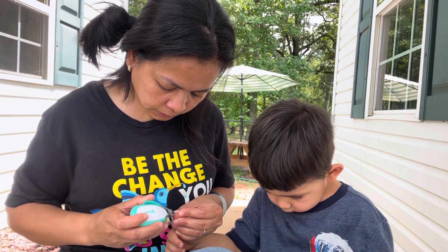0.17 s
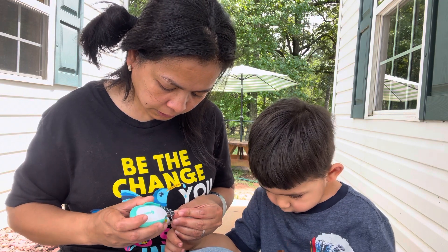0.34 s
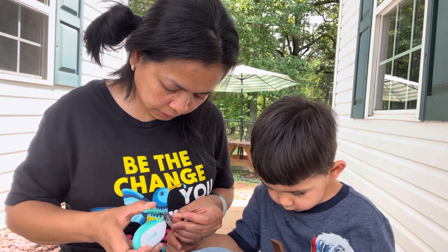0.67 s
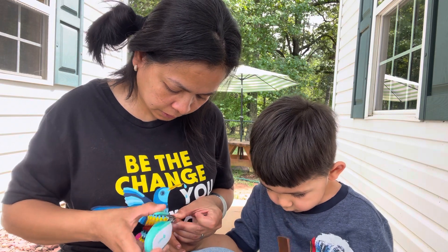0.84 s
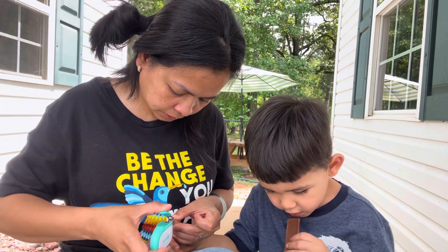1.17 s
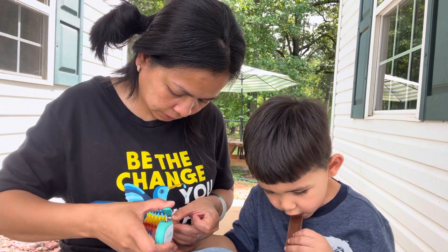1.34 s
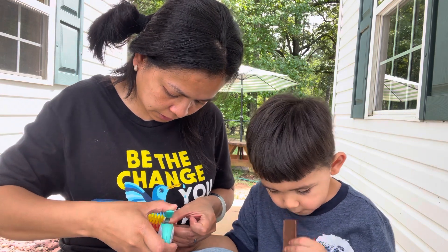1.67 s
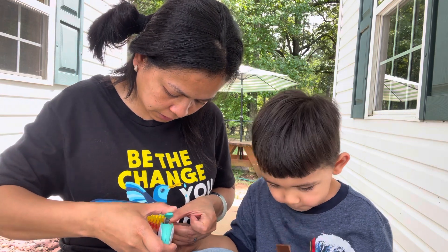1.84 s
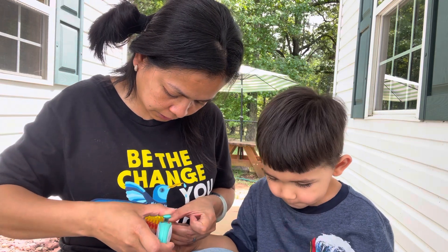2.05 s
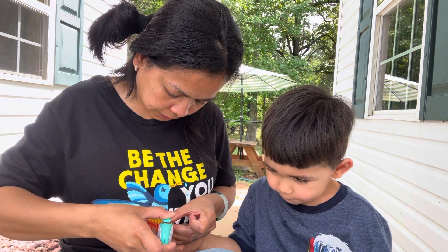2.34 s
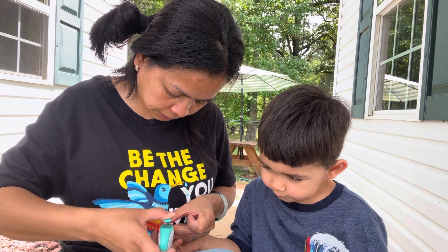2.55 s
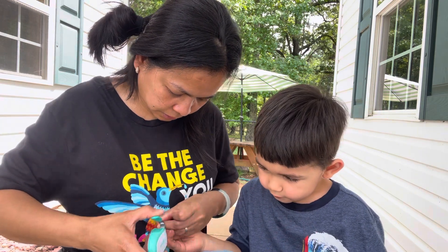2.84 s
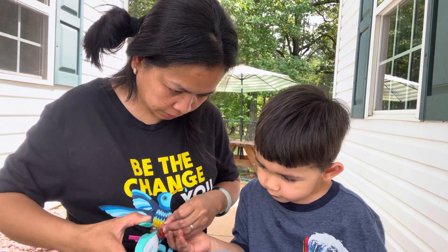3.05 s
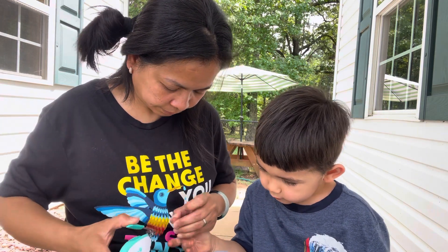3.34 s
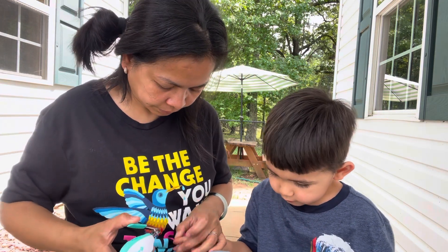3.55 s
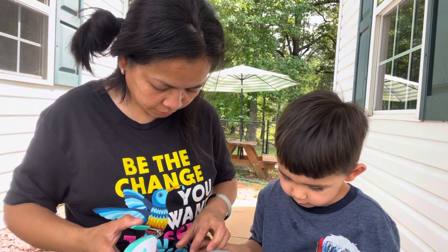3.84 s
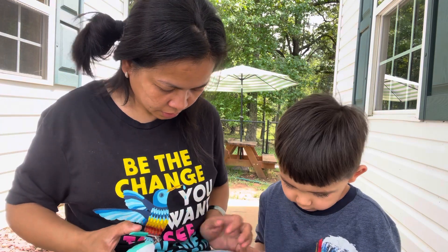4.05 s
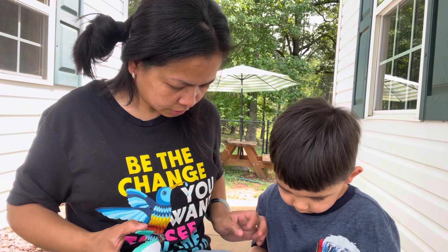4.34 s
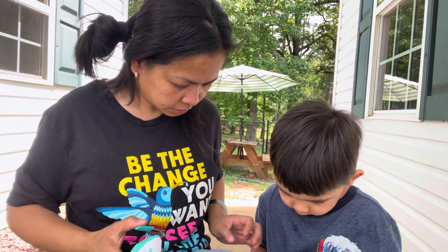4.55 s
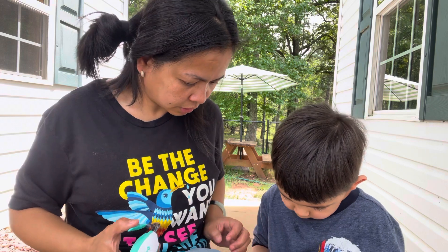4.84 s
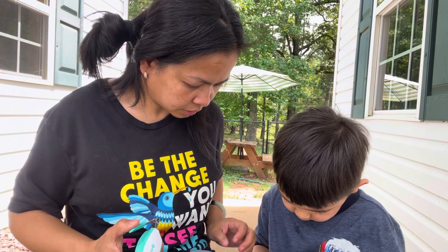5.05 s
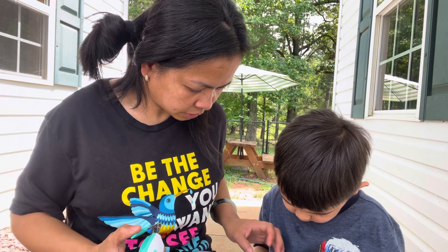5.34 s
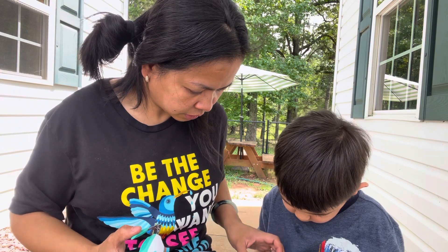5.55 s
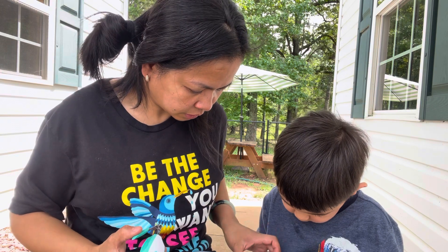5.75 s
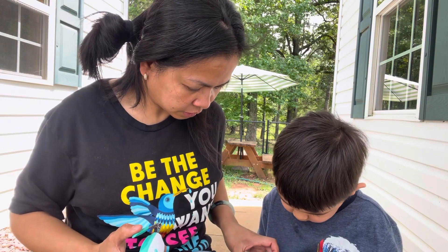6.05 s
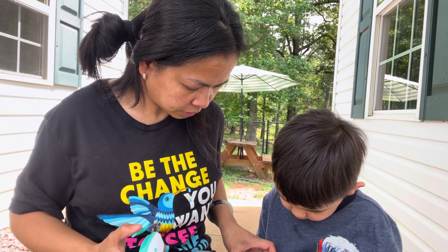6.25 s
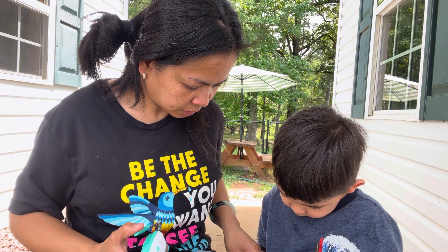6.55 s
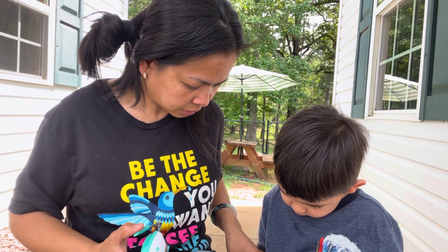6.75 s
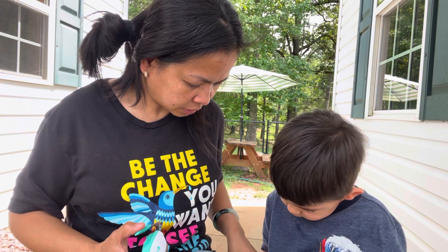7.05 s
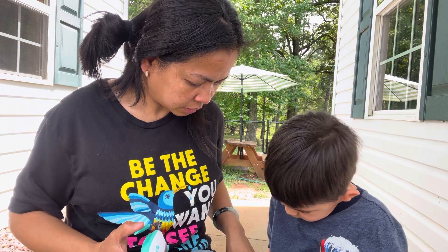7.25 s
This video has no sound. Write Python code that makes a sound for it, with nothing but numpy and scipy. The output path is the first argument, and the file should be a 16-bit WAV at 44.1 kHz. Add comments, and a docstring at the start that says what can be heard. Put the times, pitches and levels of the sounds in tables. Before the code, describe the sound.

Two crisp metallic clicks of a nail clipper on a porch, with a droning cooling unit and pulsing insects behind.

```python
"""A nail clipper snaps twice on a summer porch: each time the nail gives way in two quick slips
that ring the steel and leave a thin shimmer. A cooling unit drones beside the house, its shaft hum
surging under a wavering low tone and a beating octave while the sheet metal buzzes. Insects throb
in the trees over a soft outdoor hiss. There are a few dry ticks and one faint squeak, and cloth
rustles close by at the end."""
import sys
import numpy as np
from scipy import signal
from scipy.fft import rfft, irfft
from scipy.io import wavfile

SR = 44100
rng = np.random.default_rng(int(sys.argv[2]) if len(sys.argv) > 2 else 0)


def generate_wav(sig):
    """Save sig (samples, or channels by samples) to the path in sys.argv[1] as 16-bit PCM at SR."""
    pcm = np.round(np.clip(np.atleast_2d(sig).T, -1, 1) * 32767).astype(np.int16)
    wavfile.write(sys.argv[1], SR, pcm)


N = 326726


def amp(db):
    return 10 ** (np.asarray(db) / 20)


def unit_rms(x):
    return x / np.sqrt(np.mean(x ** 2) + 1e-20)


def automation(rows):
    """One curve through the scene for each column after time_s."""
    time_s, *columns = np.transpose(rows)
    return [np.interp(np.arange(N) / SR, time_s, column) for column in columns]


def at_hz(points, hz):
    """Read a curve along a log frequency axis."""
    point_hz, values = np.transpose(points)
    return np.interp(np.log(hz), np.log(point_hz), values)


def pan(db):
    """Stereo gains with the left db louder than the right."""
    return amp(np.array([[db], [-db]]) / 2)


def drift(rate_hz):
    """Slow random wander with a spread of 1."""
    step, settle = 40, 2000
    r = np.exp(-2 * np.pi * step * rate_hz / SR)
    slow = signal.lfilter([1], [1, -2 * r, r * r], rng.standard_normal(N // step + settle + 2))[settle:]
    return np.interp(np.arange(N) / step, np.arange(len(slow)), unit_rms(slow))


def resonate(x, hz, width_hz):
    """A single band-pass resonance."""
    r = np.exp(-np.pi * width_hz / SR)
    gain = (1 - r * r) / 2
    return signal.lfilter([gain, 0, -gain], [1, -2 * r * np.cos(2 * np.pi * hz / SR), r * r], x)


def band(noise, hz, width_hz):
    """Noise rung twice through one resonance, at unit RMS."""
    return unit_rms(resonate(resonate(noise, hz, width_hz), hz, width_hz))


def tone(phase, pan_db, lead_rad):
    """A panned sine whose left side leads in phase."""
    return np.sqrt(2) * pan(pan_db) * np.cos(phase + [[lead_rad], [0]])


def port_phase(hz):
    """Phase at the two microphone ports: in the treble the left gains on the right as pitch rises."""
    from_hz, in_step_hz, hz_per_turn = 5600, 11600, 5400
    return np.pi * (hz - in_step_hz) / hz_per_turn * (hz > from_hz) * np.array([[1], [-1]])


def at_ports(x):
    """A mono sound as it reaches the two ports."""
    hz = np.fft.rfftfreq(len(x), 1 / SR)
    return irfft(rfft(x) * np.exp(1j * port_phase(hz)), len(x))


def outdoor_hiss():
    """A far, lightly fluttering bed of air; its top end reaches both ports almost as one."""
    # tone of the hiss: frequency_hz, relative_db
    spectrum = [(45, -26), (80, -20.5), (125, -41), (260, -33.5), (480, -31.5), (750, -30), (1100, -32.5),
                (1740, -33.5), (2600, -36.5), (3500, -42.5), (5200, -43.5), (8250, -39), (8700, -44.5),
                (9200, -51), (10000, -54), (11000, -58), (12300, -62), (13500, -68), (14400, -72),
                (14800, -80)]
    # its slow swell: time_s, level_db
    swell = [(0.0, -49), (3.1, -48.5), (4.1, -47.5), (5.8, -48), (6.55, -46.5), (7.0, -47.5), (7.41, -46)]
    # how alike left and right are: frequency_hz, correlation (clipped to +-1)
    likeness = [(60, 0.024), (120, 0.65), (300, -1.17), (700, -0.55), (2000, -0.25), (5000, 0.38),
                (10000, 0.99)]
    # its lean to the left: frequency_hz, pan_db
    lean = [(60, 8), (150, -6), (380, -3.5), (950, -0.5), (2380, 2.5), (5980, 2.5), (9000, 1), (15000, -2)]
    treble_hz, treble_likeness = 7800, .97
    hz = np.maximum(np.fft.rfftfreq(N, 1 / SR), 1)
    mid, side = rfft(rng.standard_normal((2, N)))
    alike = np.clip(at_hz(likeness, hz), -1, 1)
    wide = np.sqrt(1 + alike) * mid + np.sqrt(1 - alike) * side * [[1], [-1]]
    treble = np.sqrt(treble_likeness) * mid * np.exp(1j * port_phase(hz))
    treble += np.sqrt(1 - treble_likeness) * side * [[1], [1j]]
    noise = np.where(hz > treble_hz, np.sqrt(2) * treble, wide)
    colour = amp(at_hz(spectrum, hz)) * pan(at_hz(lean, hz))[:, 0] * (hz < 1.03 * spectrum[-1][0])
    return amp(automation(swell)[0] + .4 * drift(5)) * unit_rms(irfft(noise * colour, N))


def insect_throb(rate_hz=7.22, peak_s=.02):
    """The pulse that all the insects share."""
    return np.cos(2 * np.pi * rate_hz * (np.arange(N) / SR - peak_s))


def low_insects():
    """A lower-pitched kind of insect throbs with the rest and thins out near the end."""
    # bands of their song: pitch_hz, width_hz, level_db
    song = [(4157, 510, -63), (4476, 330, -63)]
    fade_from_s, fade_db_per_s = 6.6, 4.5
    rasp = rng.standard_normal((2, N))
    fade_db = fade_db_per_s * np.maximum(np.arange(N) / SR - fade_from_s, 0)
    return sum(amp(db + 1.5 * drift(8.9) + 2 * insect_throb() - fade_db) * band(rasp, hz, width)
               for hz, width, db in song)


def tree_insects():
    """A far chorus of wing resonances and one nearer singer, throbbing in trees to the left."""
    # swell of the song: time_s, chorus_db, singer_db
    swell = [(0.0, -50.5, -57.5), (1.0, -51.5, -55.5), (2.0, -51, -54.5), (3.2, -48.5, -61),
             (4.5, -50, -58), (5.3, -47, -80), (6.7, -51, -78), (7.41, -50, -76)]
    # broad wing resonances: pitch_hz, relative_db
    wings = [(6100, -2.5), (6350, -2), (6640, 1.5), (6900, 0), (7200, 3), (7500, -4), (7800, -3),
             (8100, -4)]
    # single thin voices in the chorus: pitch_hz, width_hz, relative_db
    thin_voices = [(6050, 30, -13), (6245, 25, -8), (6340, 25, -12), (6420, 25, -10), (6500, 25, -9),
                   (6700, 30, -9), (6845, 25, -8), (6930, 25, -11), (6985, 25, -9), (7120, 25, -10),
                   (7170, 25, -12), (7296, 25, -9), (7440, 30, -11), (7670, 30, -12), (7800, 30, -11),
                   (7940, 30, -11), (8050, 35, -12), (8250, 40, -15)]
    chorus_db, singer_db = automation(swell)
    throb = insect_throb()
    left, right = at_ports(rng.standard_normal(N))
    rasp = np.array([left, np.roll(right, 1)]) + .8 * rng.standard_normal((2, N))
    rasp = signal.sosfilt(signal.butter(4, 9000, fs=SR, output="sos"), rasp)
    chorus = sum((-1) ** k * amp(db + 1.5 * drift(2.5) + 1.5 * throb) * band(rasp, hz, width_hz=380)
                 for k, (hz, db) in enumerate(wings))
    other_rasp = np.roll(rasp, N // 2, axis=1)
    chorus += sum(amp(db + 6 + 3.3 * drift(1.4) + 1.4 * throb) * band(other_rasp, hz, width)
                  for hz, width, db in thin_voices)
    singer = amp(4 * throb + drift(6)) * band(rasp, hz=6635, width_hz=90)
    return pan(2.5) * (amp(chorus_db) * unit_rms(chorus) + amp(singer_db) * unit_rms(singer))


def cooling_unit():
    """Shaft harmonics surge together in level and pitch, drone tones waver and sheet metal buzzes."""
    # shaft hum: harmonic, level_db, pan_db, left_lead_rad
    shaft = [(2, -51, 0, 0), (3, -50.5, 0, 0), (4, -55, -2, -.2), (5, -38, -3.7, -.05), (6, -46, -5, .34),
             (7, -53, -1, -.15), (8, -52, -1.5, -1.2), (10, -60, 5, 1.2), (11, -65, 3, 1.7)]
    # the low tone sinks and returns: trough_s, fall_s, return_s, depth_db
    dips = [(1.1, 0.72, 0.31, 11), (3.6, 0.41, 0.16, 28), (6.75, 0.61, 0.17, 14)]
    # swells of the octave, ahead of its beating: time_s, level_db
    octave_swells = [(0.2, -50), (1.05, -36.5), (1.6, -41), (2.9, -40.5), (4.2, -40.5), (5.0, -54),
                     (5.75, -38.5), (6.5, -54), (7.3, -48.5)]
    # steady rattle of the panels: pitch_hz, width_hz, level_db, pan_db
    panels = [(90.6, 115, -52.5, 0), (564.4, 14.4, -64, -9.5), (609.5, 6.6, -69.5, 7), (666, 15, -70.5, 0),
              (1429, 33, -76, 14), (1741, 24, -72.5, 15)]
    # buzz of the casing: pitch_hz, width_hz, relative_db, pan_db
    casing = [(152.8, 17.7, 0.5, -5.5), (250.7, 6.3, -12, 15.5), (310.7, 21.8, -1, 4), (360, 75, -6.5, 4)]
    shaft_hz, drone_hz, octave_hz = 22.912, 103.07, 206.75
    surge_period_s, surge_peak_s = 1.38, 1.08
    beat_depth, beat_trough_s, overtone_lag_s = .39, .77, .13
    t = np.arange(N) / SR
    surge = 1 + .11 * np.exp(-2j * np.pi * (t - surge_peak_s) / surge_period_s)
    out = np.zeros((2, N))
    for harmonic, db, pan_db, lead_rad in shaft:
        level = amp(db + 1.74 * drift(8.2)) * np.abs(surge)
        phase = 2 * np.pi * harmonic * shaft_hz * t + np.angle(surge) + .66 * drift(6.4)
        out += level * tone(phase, pan_db, lead_rad)
    dip_db = sum(db * np.exp(-((t - s) / np.where(t < s, fall, back)) ** 2) for s, fall, back, db in dips)
    drone_db = -33 + drift(2.9) - dip_db
    buzz_db = -55.5 + t + .06 * drift(2.1)  # creeps up 1 dB a second
    drone_phase = 2 * np.pi * drone_hz * (t - .0024) + .12 * drift(25)
    out += amp(drone_db) * tone(drone_phase, pan_db=-3, lead_rad=-.3)
    # the octave beats once in each surge
    beat_phase = 2 * np.pi * (t - beat_trough_s) / surge_period_s
    beat = np.abs(1 - beat_depth * np.exp(1j * beat_phase)) / (1 + beat_depth)
    octave_db = automation(octave_swells)[0] + 2.5 * drift(7)
    octave_phase = 2 * np.pi * octave_hz * t + .45 * drift(1.5)
    out += beat * amp(octave_db) * tone(octave_phase, pan_db=.5, lead_rad=-1.18)
    shake = rng.standard_normal(N) + .42 * rng.standard_normal((2, N))
    # an upper overtone swells just after each beat
    late_beat = np.roll(beat, round(overtone_lag_s * SR))
    out += amp(-55.5) * late_beat * pan(3.3) * band(shake, hz=412, width_hz=8.6)
    rattle = sum(amp(db) * pan(pan_db) * band(shake, hz, width) for hz, width, db, pan_db in panels)
    buzz = sum(amp(db) * pan(pan_db) * band(shake, hz, width) for hz, width, db, pan_db in casing)
    return out + rattle + amp(buzz_db) * buzz


def squeak():
    """A faint rough scrape: a band of noise that scoops up in pitch and fades."""
    start_s, length_s, edge_s = 3.88, .41, .003
    from_hz, to_hz, glide_s = 1500, 2300, .012
    level_db, fade_db_per_s = -56, 23
    age = np.maximum(np.arange(N) / SR - start_s, 0)
    hz = to_hz - (to_hz - from_hz) * np.exp(-age / glide_s)
    gate = np.clip(np.minimum(age, length_s - age) / edge_s, 0, 1)
    grit = signal.sosfilt(signal.butter(4, 280, fs=SR, output="sos"), rng.standard_normal((2, N)))
    phase = 2 * np.pi * np.cumsum(hz) / SR
    scrape = unit_rms(grit[0] * np.cos(phase) + grit[1] * np.sin(phase))
    return gate * amp(level_db - fade_db_per_s * age) * scrape


def cloth_rustle():
    """Cloth drags close by: a dull body with a bump near 1 kHz, and fine fibre noise on top."""
    # shape of the drag: time_s, body_db, fibre_db
    drag = [(7.28, -63, -88), (7.352, -35, -49.5), (7.372, -41.5, -73), (7.386, -36.5, -47),
            (7.397, -37, -56), (7.409, -52, -50)]
    body_db, fibre_db = automation([(drag[0][0] - .05, -110, -110)] + list(drag))
    friction = rng.standard_normal(N)
    rub = friction + .5 * rng.standard_normal((2, N))
    body = (.78 * band(rub, hz=945, width_hz=200) + .75 * band(rub, hz=475, width_hz=140)
            + 1.27 * band(rub, hz=273, width_hz=170) + .34 * band(rub, hz=1450, width_hz=270)
            + .22 * band(rub, hz=3500, width_hz=1600))
    fibre = signal.sosfilt(signal.butter(4, [8000, 15500], "band", fs=SR, output="sos"), at_ports(friction))
    fibre = resonate(fibre, hz=9700, width_hz=1100)
    return amp(body_db) * unit_rms(body) + amp(fibre_db) * unit_rms(fibre)


def dry_ticks():
    """Small ticks from fingers and seat, each a sine damped almost at once."""
    # light contacts: start_s, level_db, pitch_hz, decay_per_s
    contacts = [(1.179, -30.5, 3800, 1800), (1.1795, -33.5, 4900, 1800), (3.887, -44, 1900, 900),
                (7.387, -30, 6000, 1480), (7.387, -20, 9600, 3000), (7.389, -41, 13600, 2000)]
    out, t = np.zeros((2, N)), np.arange(round(.01 * SR)) / SR
    attack = np.sin(np.pi / 2 * np.minimum(t / .00012, 1)) ** 2
    for start_s, db, hz, decay_per_s in contacts:
        ping = np.sin(2 * np.pi * hz * t + port_phase(hz)) * np.exp(-t * decay_per_s)
        i = round(start_s * SR)
        out[:, i:i + len(t)] += amp(db) * attack * ping
    return out


def nail_clipper():
    """The nail gives way in two slips that ring the steel; a thin shimmer dies away after them."""
    # snaps of the jaws: start_s, level_db, tilt_db_per_octave, lever_pan_db, second_slip_s,
    # second_slip_db, grip_pitch_ratio, lever_db, jaw_tip_db, shimmer_db
    snaps = [(0.2920, -21.5, 2.5, -3, 0.0006, -9, 0.927, -4, 4, 3),
             (2.3280, -19.5, 0.5, -7, 0.0005, -13, 1.007, 0, -3, 1.5)]
    # steel modes, the lever low and the jaw tips high: pitch_hz, relative_db, t60_s
    steel = [(420, -10, .007), (680, -4.5, .0045), (1030, -2, .005), (1450, -3, .0065), (1800, -6, .005),
             (2200, -4, .005), (2800, -4.5, .005), (3430, -5.5, .011), (3700, -11, .007), (4300, -7, .005),
             (4600, -7.5, .007), (5250, -7, .009), (6200, -7, .008), (7600, -7, .006), (8300, -6.5, .006),
             (9500, -7, .006), (10450, -3.5, .006), (11750, -3.5, .006), (12700, -9, .006),
             (14200, -14, .007), (15600, -8, .007)]
    # noisy tail of a snap: pitch_hz, width_hz, relative_db, t60_s
    shimmer = [(5000, 700, -29, .16), (10500, 800, -32, .17), (11200, 900, -30, .19),
               (12000, 800, -31.5, .19), (15500, 380, -28, .12)]
    lever_top_hz, jaw_tip_from_hz, shimmer_top_hz = 6500, 12200, 16200
    lever_lag_s, attack_s, crackle_t60_s = .00035, .0004, .012
    out, t = np.zeros((2, N)), np.arange(round(.3 * SR)) / SR
    for start_s, level_db, tilt, pan_db, slip_s, slip_db, grip, lever_db, tip_db, shimmer_db in snaps:
        snap = np.zeros((2, len(t)))
        for blow_s, blow_db in ((0, 0), (slip_s, slip_db)):
            for hz, db, t60 in steel:
                on_lever = hz < lever_top_hz
                hz *= grip ** on_lever  # the grip retunes only the lever
                age = np.maximum(t - blow_s - lever_lag_s * on_lever, 0)
                db += lever_db * on_lever + tip_db * (hz > jaw_tip_from_hz)
                strength = amp(blow_db + db + tilt * np.log2(hz / 6000) + rng.normal(0, 1, (2, 1)))
                envelope = amp(-60 * age / t60) * np.minimum(age / attack_s, 1)
                ring = np.sin(2 * np.pi * hz * age + port_phase(hz))
                snap += strength * pan(pan_db * on_lever) * envelope * ring
        haze = at_ports(rng.standard_normal(len(t))) + .15 * rng.standard_normal((2, len(t)))
        haze = signal.sosfilt(signal.cheby2(8, 40, shimmer_top_hz, fs=SR, output="sos"), haze)
        crackle = resonate(haze, hz=5000, width_hz=8000)  # the nail breaking
        snap += amp(-8 - 60 * t / crackle_t60_s) * crackle * np.minimum(t / attack_s, 1)
        for hz, width, db, t60 in shimmer:
            db += lever_db if hz < lever_top_hz else shimmer_db
            snap += amp(db - 60 * t / t60) * band(haze, hz, width)
        i = round(start_s * SR)
        out[:, i:i + len(t)] += amp(level_db) * snap
    return out


def scene():
    bed = cooling_unit() + outdoor_hiss() + tree_insects() + low_insects()
    return bed + nail_clipper() + dry_ticks() + squeak() + cloth_rustle()


def record(dry):
    """Cut the deepest bass and the very top."""
    low_cut = signal.cheby2(6, 16, 37, "high", fs=SR, output="sos")
    high_cut = signal.cheby2(12, 70, 17200, fs=SR, output="sos")
    return signal.sosfilt(high_cut, signal.sosfilt(low_cut, dry))


dry = scene()
out = record(dry)
generate_wav(out)
```